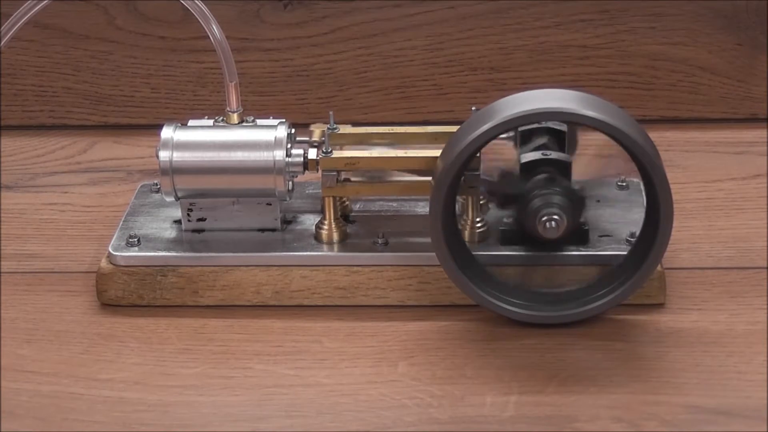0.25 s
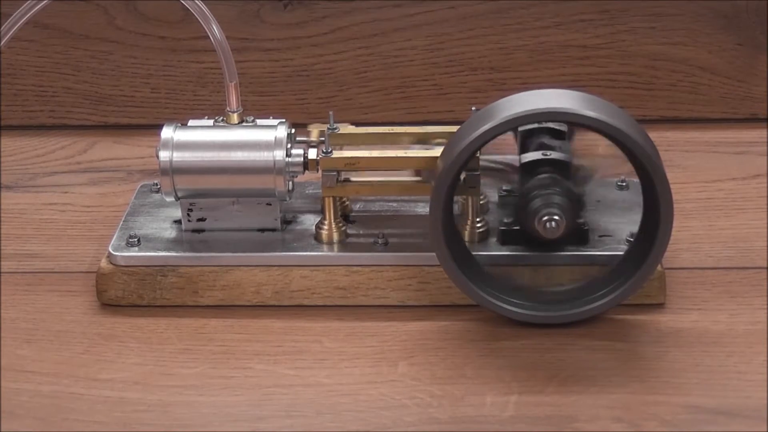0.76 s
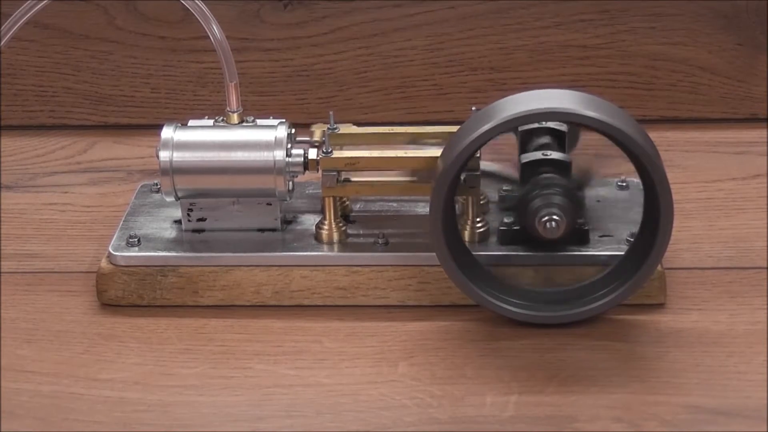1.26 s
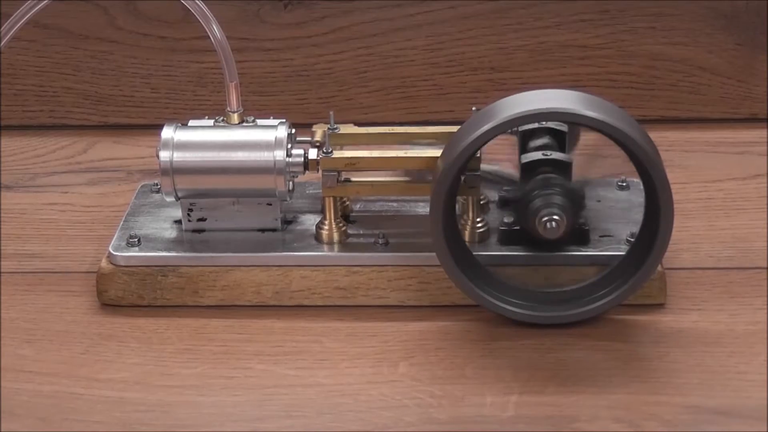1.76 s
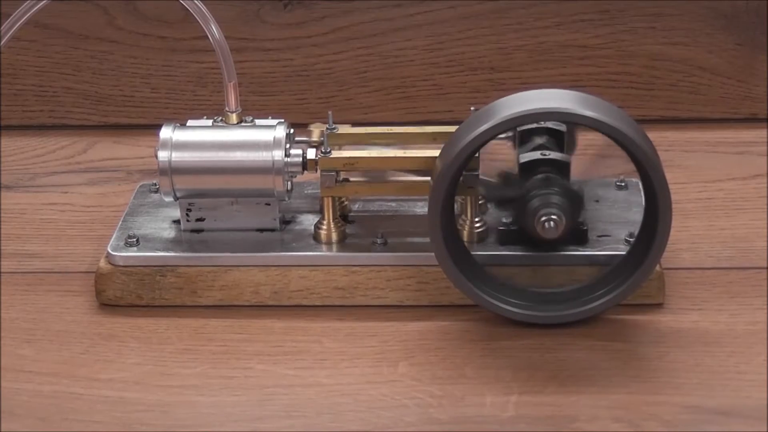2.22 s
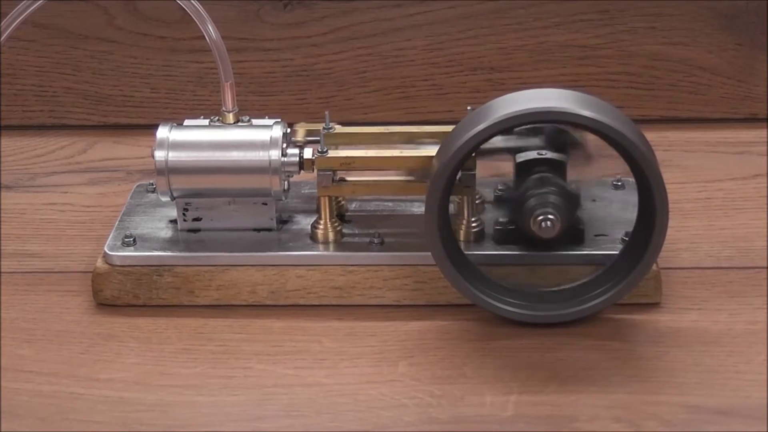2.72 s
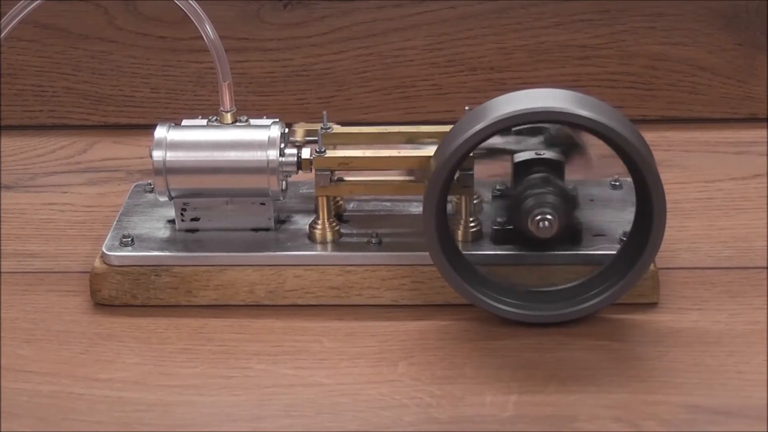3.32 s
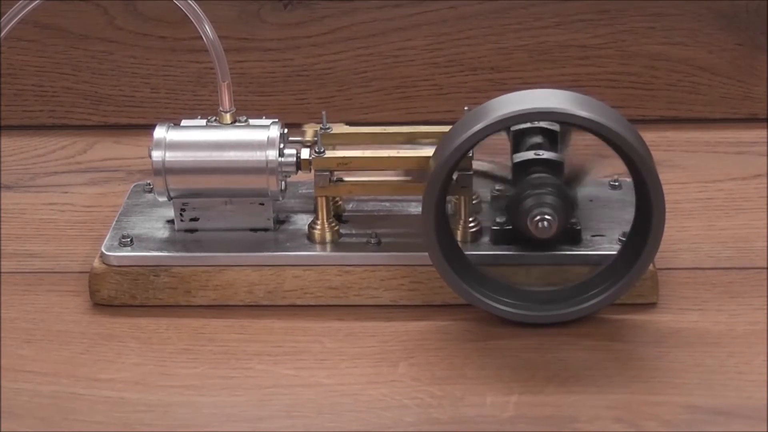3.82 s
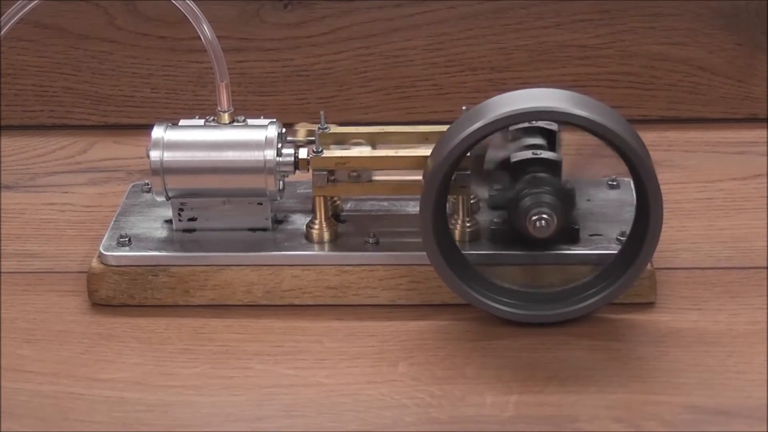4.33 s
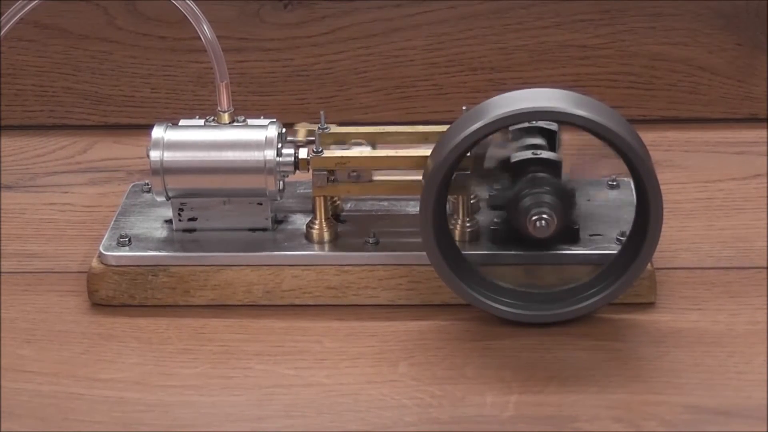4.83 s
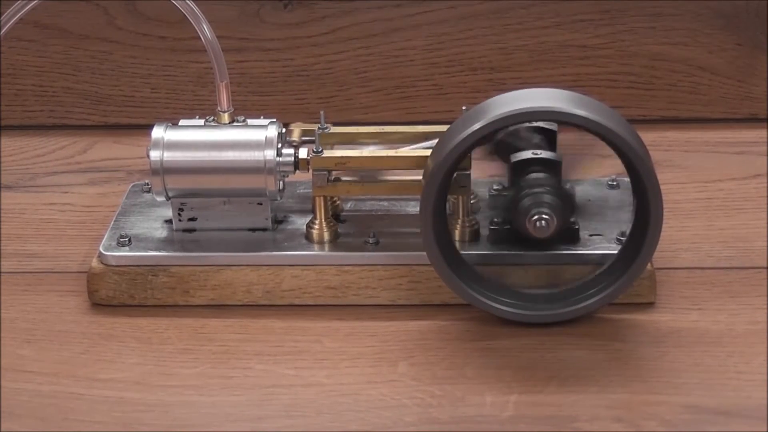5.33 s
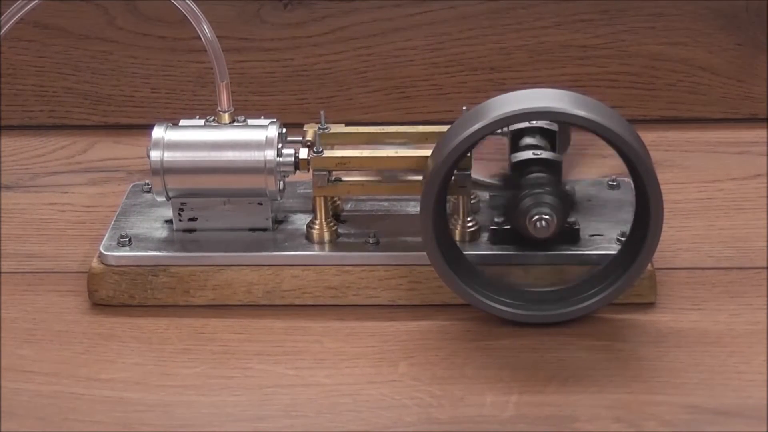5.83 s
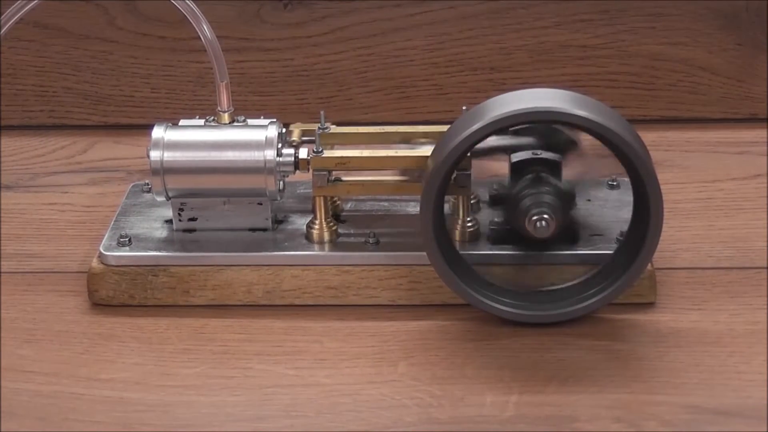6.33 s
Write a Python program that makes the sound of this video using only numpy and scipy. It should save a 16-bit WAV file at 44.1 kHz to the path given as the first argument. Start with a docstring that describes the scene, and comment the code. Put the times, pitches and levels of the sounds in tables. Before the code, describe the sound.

Rapid, regular clicking knocks and sharp exhaust puffs from a little flywheel engine, about six a second, over constant airy, whistling hiss.

```python
"""A small single-cylinder model steam engine runs on a wooden bench, from about five turns a second to
nearly seven and back. Each turn the valve lets out one strong and one weak exhaust puff: shaped noise.
A leak at the cylinder whistles high above: narrow noise bands that dip as the valve changes over.
The crank knocks once a turn: noise clicks, pings, a modal ring of the base, bench drum and low thuds.
The knocks have a short tail of reflections; steady low room noise lies under it all."""
import sys
import numpy as np
from scipy import signal
from scipy.fft import rfft, irfft
from scipy.io import wavfile

SR = 44100
rng = np.random.default_rng(int(sys.argv[2]) if len(sys.argv) > 2 else 0)


def output_pcm(signal):
    """Save a mono or channel-first signal as 16-bit PCM at the path in sys.argv[1].

    Samples are clipped to [-1, 1] before scaling.
    """
    pcm = np.clip(np.atleast_2d(signal).T, -1, 1) * 32767
    wavfile.write(sys.argv[1], SR, np.round(pcm).astype(np.int16))


N = 289737
TIME, HZ = np.arange(N) / SR, np.fft.rfftfreq(N, 1 / SR)


def gain_of(db):
    """Decibels to amplitude."""
    return 10 ** (np.asarray(db) / 20)


def evened(x):
    """Scales to an rms of one."""
    return x / np.sqrt(np.mean(x ** 2) + 1e-20)


def trace(points, x):
    """Joins the points by straight lines."""
    return np.interp(x, *np.transpose(points))


def read(points, hz):
    """Joins the points by straight lines on a log-frequency axis."""
    f, value = np.transpose(points)
    return np.interp(np.log(hz + 1), np.log(f + 1), value)


def add(mix, s, sound):
    """Mixes a sound into mix, in place, at time s."""
    part = mix[..., round(s * SR):][..., :sound.shape[-1]]
    part += sound[..., :part.shape[-1]]


def bell(centre_hz, width_hz):
    """Resonance curve: 1 at the centre, 1/2 at half a width to either side."""
    return 1 / (1 + (2 * (HZ - centre_hz) / width_hz) ** 2)


def wander(rate_hz):
    """Smooth chance of rms one, mostly slower than the rate."""
    return evened(irfft(rfft(rng.standard_normal(N)) * np.exp(-(HZ / rate_hz) ** 2), N))


# likeness of left and right: (frequency [Hz], likeness [-1..1])
LIKENESS = [(100, .7), (400, .95), (900, .9), (1500, .98), (3000, .93), (4500, .995), (8000, .995),
            (9600, .98), (11000, .7), (12500, .6), (14200, .1), (16000, .2)]
# left minus right: (frequency [Hz], difference [dB])
BALANCE = [(100, 1), (1300, 0), (2400, -.5), (4400, 0), (9000, 0), (13000, 3.5), (16000, 0)]


def noise(gain, likeness=LIKENESS, spread=1):
    """Stereo noise, rms one, spectrum gain, partly alike; spread scales how much the sides differ."""
    common, apart = rfft(rng.standard_normal((2, N)))
    same = np.clip(1 - spread * (1 - read(likeness, HZ)), -1, 1)
    lean = gain_of(read(BALANCE, HZ) / 2)
    mid, side = common * np.sqrt(1 + same), apart * np.sqrt(1 - same)
    return evened(irfft(gain * np.array([(mid + side) * lean, (mid - side) / lean]), N))


# crank speed: (time [s], speed [turns/s])
SPEED = [(0.0, 4.822), (0.81, 6.02), (1.11, 5.633), (1.42, 6.245), (2.11, 6.706), (3.2, 6.752),
         (3.74, 6.654), (5.06, 6.116), (5.98, 5.189), (6.57, 4.519)]
FIRST_KNOCK_S = 0.1335


def crank_angle():
    """Turns made since the first knock: the integral of the speed."""
    turns = np.cumsum(trace(SPEED, TIME)) / SR
    return turns - np.interp(FIRST_KNOCK_S, TIME, turns)


def passes(angle, share):
    """The moments [s], one a turn, at which the crank passes this share of its turn."""
    turns = np.arange(np.ceil(angle[0] - share), angle[-1] - share)
    return np.interp(turns + share, angle, TIME)


def turn_by_turn(times, scatter_db):
    """A level in dB drawn anew at each of the times, with straight lines between."""
    return np.interp(TIME, times, scatter_db * rng.standard_normal(len(times)))


# room noise spectrum: (frequency [Hz], relative level [dB/Hz])
ROOM_NOISE = [(20, -60), (55, -40), (90, -9), (145, 2.5), (230, -19), (450, 4), (900, -9), (3000, -2.5),
              (16000, -64)]


def room_noise():
    """Steady noise of the room, mostly low."""
    likeness = [(150, 0.96), (700, 1.0), (1500, 0.95)]
    return gain_of(-59) * noise(gain_of(read(ROOM_NOISE, HZ)), likeness)


# narrow resonances of frame and surroundings: (frequency [Hz], boost [dB])
COLOUR = [(1184, 5.5), (1421, 9), (1582, 4), (2121, 8), (2325, 7.5), (2457, 8), (2626, 11), (3294, 7),
          (3420, 10), (3466, -3), (3648, 10), (4005, 10), (4180, 2), (4310, 10), (4640, 7.5), (5087, 11),
          (5857, 10), (6022, 9), (6372, 8.5), (6809, 10.5), (7362, 10), (8252, 7), (9016, 5.5), (9265, 4),
          (9603, 1), (9830, 1.5)]


def frame_colour():
    """Resonances of the frame and its surroundings, as a gain on all the hiss."""
    return gain_of(sum(db * bell(hz, width_hz=26.7) for hz, db in COLOUR))


def jet(hiss, angle, flow, flutter_db, flutter_hz, spit_db):
    """Hiss that follows the valve; it flutters slowly and spits finely."""
    level_db = trace(flow, angle % 1)
    level_db += flutter_db * wander(flutter_hz) + spit_db * wander(rate_hz=850)
    return hiss * gain_of(level_db)


# main puff spectrum: (frequency [Hz], relative level [dB/Hz])
PUFF = [(60, -50), (150, -11.5), (700, -17.5), (1200, -10.5), (1950, -9), (2450, -2), (3600, 0.5),
        (4700, -0.5), (7000, -2), (9000, -4.5), (11000, 0.5), (13000, -0.5), (14300, -5), (16000, -9.5)]
# main puff over one turn from the knock: (share of turn [0-1], relative level [dB])
PUFF_FLOW = [(0, -1.5), (.06, -2.5), (.15, -6.5), (.3, -7.5), (.5, -16), (.658, -7.5), (.69, -1.5),
             (.76, -0.5), (1, 1.5)]
# slow drift of the main puff: (time [s], level [dB])
EXHAUST_LEVEL = [(0, 0), (2, -1), (2.8, .4), (3.6, -.4), (5.4, 0.8), (6.57, 0.8)]


def main_puff(angle, colour):
    """Strong exhaust puff: broadband hiss gated by the valve, a little different every turn."""
    hiss = noise(colour * gain_of(read(PUFF, HZ)), spread=0.47)
    puff = jet(hiss, angle, PUFF_FLOW, flutter_db=0.84, flutter_hz=55, spit_db=0.94)
    level_db = turn_by_turn(passes(angle, 0), scatter_db=0.5) + trace(EXHAUST_LEVEL, TIME)
    return gain_of(level_db - 34.0) * puff


# exhaust passage resonances: (frequency [Hz], width [Hz], relative level [dB])
PIPE = [(5560, 250, -2.5), (5740, 80, -0.5), (6097, 540, -5)]
# pipe note over one turn from the knock: (share of turn [0-1], relative level [dB])
PIPE_FLOW = [(0, -2), (.1, -8), (.3, -14), (.55, -39), (.68, -28), (.73, -9), (.79, -3.5), (1, -4)]
USUAL_TURNS_PER_S, NOTE_DB_PER_TURN_PER_S = 5.95, 2


def pipe_note(angle, colour):
    """Hiss through the resonances of the exhaust passage, louder the faster the engine runs."""
    pipe = np.sqrt(sum(gain_of(db) ** 2 * bell(hz, width) ** 2 for hz, width, db in PIPE))
    hiss = noise(colour * pipe, spread=0.35)
    note = jet(hiss, angle, PIPE_FLOW, flutter_db=2.0, flutter_hz=30, spit_db=1.9)
    haste = trace(SPEED, TIME) - USUAL_TURNS_PER_S
    level_db = turn_by_turn(passes(angle, 0), scatter_db=0.5) + NOTE_DB_PER_TURN_PER_S * haste
    return gain_of(level_db - 37.0) * note


# return puff spectrum: (frequency [Hz], relative level [dB/Hz])
RETURN = [(60, -40), (300, -7.5), (1000, -11.5), (1950, -11), (2500, -3.5), (3600, 0.5), (4600, -6),
          (6500, -7.5), (10000, -6), (13000, -12.5), (16000, -17.5)]
# return puff over one turn from the knock: (share of turn [0-1], relative level [dB])
RETURN_FLOW = [(0, -8.5), (.153, -3.5), (.21, -1), (.31, -1), (.45, -2.5), (.6, -3), (.66, -11), (1, -5)]


def return_puff(angle, colour):
    """Weaker puff of the return stroke: hiss gated by the valve."""
    hiss = noise(colour * gain_of(read(RETURN, HZ)), spread=0.21)
    puff = jet(hiss, angle, RETURN_FLOW, flutter_db=2.2, flutter_hz=39.4, spit_db=1.0)
    return gain_of(-38.5) * puff


def spits(times, size_db, scatter_db, t60_s):
    """Extra gain for a few milliseconds as the valve snaps open."""
    gain, t = np.ones(N), np.arange(SR // 20) / SR
    for s, chance in zip(times, rng.uniform(-1.2, 1, len(times))):
        add(gain, s, gain_of(size_db + scatter_db * chance - 60 * t / t60_s))
    return gain


# leak hiss spectrum: (frequency [Hz], relative level [dB/Hz])
LEAK = [(100, -41), (4000, -41), (6700, -13), (7500, -3.5), (8400, -1), (9500, -7.5), (10400, -10),
        (11300, -3), (12500, -7.5), (15000, -7.5), (16000, -12)]
# leak over one turn from the knock: (share of turn [0-1], relative level [dB])
LEAK_FLOW = [(0, -3.5), (.08, -4.5), (.157, -8.5), (.187, .5), (.27, -0.5), (.42, -3.5), (.58, -0.5),
             (.655, -8), (.695, 0), (.9, -5.5), (1, -1.5)]
# whistles of the leak: (frequency [Hz], width [Hz], relative level [dB])
WHISTLES = [(9000, 760, -7), (9726, 940, 0)]
RETURN_AT = 0.182  # share of a turn after the knock at which the valve opens for the return stroke


def whistling_leak(angle, colour):
    """Leak at the cylinder: high hiss and two noise-band whistles, each fluttering on its own."""
    hiss = noise(colour * gain_of(read(LEAK, HZ)))
    leak = gain_of(-38.0) * jet(hiss, angle, LEAK_FLOW, flutter_db=0.7, flutter_hz=45, spit_db=0.0)
    for hz, width, db in WHISTLES:
        band = noise(colour * bell(hz, width), spread=0.49)
        whistle = jet(band, angle, LEAK_FLOW, flutter_db=2.5, flutter_hz=53.6, spit_db=1.5)
        leak += gain_of(db - 37.5) * whistle
    returns = passes(angle, RETURN_AT)
    leak *= gain_of(turn_by_turn(returns, scatter_db=0.5))
    return leak * spits(returns, size_db=-10.5, scatter_db=12, t60_s=0.017)


def steam(angle):
    """Main puff with its pipe note, the weaker return puff, and the whistling leak."""
    colour = frame_colour()
    exhaust = main_puff(angle, colour) + pipe_note(angle, colour)
    return exhaust + return_puff(angle, colour) + whistling_leak(angle, colour)


def nearest(times, s):
    """Index of the time closest to s."""
    return np.argmin(abs(times - s))


HARD_KNOCKS = [.51, .69, 1.02, 2.89, 3.03, 3.18, 4.55, 4.87, 5.03, 5.36, 5.91]
HARD_CLICK_DB, HARD_RING_DB = 3, 1.3
RING_SCATTER_DB, SOFT_CLICK_DB = 0.76, 2.5


def knock_levels(times):
    """Ring and click of each knock in dB: most clicks firm, a few soft, the hard ones standing out."""
    weight, softness = rng.standard_normal((len(times), 2)).T
    hard = np.isin(np.arange(len(times)), [nearest(times, s) for s in HARD_KNOCKS])
    ring_db = RING_SCATTER_DB * weight + HARD_RING_DB * hard
    click_db = np.where(hard, HARD_CLICK_DB, -SOFT_CLICK_DB * softness ** 2)
    return ring_db, click_db


# modes of bed plate and wooden base: (frequency [Hz], relative level [dB], t60 [s], polarity [+1/-1])
BASE = [(152.1, -53.5, 0.29, 1), (327.6, -44, 0.2, 1), (413.6, -36.5, 0.22, 1), (455.3, -52, 0.29, 1),
        (501.5, -44, 0.33, -1), (555, -48.5, 0.3, -1), (622, -42, 0.1, -1), (791, -46.5, 0.069, -1),
        (869, -53, 0.18, 1), (1070, -56, 0.027, -1), (1168, -41, 0.045, -1), (1320, -40.5, 0.04, 1),
        (1582, -50.5, 0.15, 1), (1705, -50, 0.12, -1)]


def ring(t, scatter_db, detune, swell_s):
    """The base takes up the blow and rings with its modes, a little differently every time."""
    hz, db, t60_s, polarity = np.transpose(BASE)[:, :, None]
    size, shift = rng.standard_normal((2, len(BASE), 1))
    decay = polarity * gain_of(db + scatter_db * size - 60 * t / t60_s)
    modes = decay * np.sin(2 * np.pi * hz * (1 + detune * shift) * t)
    return modes.sum(0) * (1 - np.exp(-t / swell_s))


# bearing click spectrum: (frequency [Hz], relative level [dB/Hz])
CLICK = [(60, -29), (300, -1.5), (1200, -3), (2000, 2.5), (3500, -5), (6000, -30), (10000, -0.5),
         (13200, -2.5), (16000, -5)]


def knocks(times):
    """Bearing play closes once a turn: sharp click, short rattle, ring of the base, drum of the bench."""
    t = np.arange(SR // 3) / SR
    rings, drums, blows = np.zeros((3, N))
    click = gain_of(-29.5 - 60 * t / 0.0054)  # t60 in s, as below
    rattle = gain_of(-40 - 60 * t / 0.16)
    drum = gain_of(-45.0 - 60 * t / 0.25) * (1 - np.exp(-t / 0.01))  # blurred 10 ms onset
    for s, weight_db, blow_db in zip(times, *knock_levels(times)):
        add(rings, s, gain_of(weight_db - 4.0) * ring(t, scatter_db=1.5, detune=0.012, swell_s=0.0016))
        add(drums, s, gain_of(weight_db) * drum)
        add(blows, s, gain_of(blow_db) * (click + rattle))
    bench_gain = bell(centre_hz=444, width_hz=355) * (HZ > 100)
    bench = noise(bench_gain, likeness=[(250, 1.0), (700, 0.76)])
    return rings + drums * bench + blows * noise(gain_of(read(CLICK, HZ)))


def pings(times, ping_db, centre_hz, width_hz, t60_s, scatter_db):
    """Steel meeting steel gives every knock a tiny, very high ping: a decaying noise band."""
    t, blows = np.arange(SR // 20) / SR, np.zeros(N)
    for s, chance in zip(times, rng.uniform(-1.3, 1, len(times))):
        add(blows, s, gain_of(ping_db + scatter_db * chance - 60 * t / t60_s))
    return blows * noise(bell(centre_hz, width_hz), spread=0.5)


def thud_shape(crest_s, rebound):
    """One short push and a longer swing back."""
    u = np.arange(SR // 30) / SR / crest_s
    return np.exp(-(2.46 * (u - 1)) ** 2) - rebound * np.exp(-(1.05 * (u - 2.6)) ** 2)


# (time [s], relative level [dB], share opposite in left and right [0-1])
THUDS = [(.13, -31, 0.85), (.33, -22.5, 0.8), (.51, -28, 0.56), (.85, -28, 0.91), (1.37, -21, 0.89),
         (1.53, -34, 0.92), (1.68, -20.5, .89), (1.84, -32, 0.93), (2.29, -35, 0.98), (2.59, -31, 0.3),
         (2.89, -29, .8), (3.18, -25, .89), (3.33, -21, .86), (3.48, -30, .87), (3.63, -21.5, 0.82),
         (4.55, -27, 0.84), (4.71, -28.5, .9), (4.87, -22, .9), (5.72, -21, 0.9), (5.91, -32, 0.13),
         (6.31, -23.5, 0.8)]


def thuds(times, opposite_db, common_db):
    """A dry low thud comes with the heavy knocks, partly opposite in the two ears."""
    sides = np.array([[0.97], [-1.03]])
    opposite = gain_of(opposite_db) * thud_shape(crest_s=0.0014, rebound=0.42) * sides
    common = gain_of(common_db) * thud_shape(crest_s=0.0026, rebound=0.22)
    out = np.zeros((2, N))
    for s, db, share in THUDS:
        thud = share * opposite - (1 - share) * common
        add(out, times[nearest(times, s)], gain_of(db) * thud)
    return out


def room(x, wet_db, t60_s, apart):
    """A short tail of sparse reflections, mostly the same on both sides."""
    t = np.arange(SR // 2) / SR
    sparse = rng.random((2, len(t))) < 3000 / SR  # 3000 reflections/s
    taps = rng.standard_normal((2, len(t))) * sparse * (t > 0.005) * gain_of(-60 * t / t60_s)
    mid, side = taps / np.linalg.norm(taps, axis=1, keepdims=True)
    tail = np.array([mid + apart * side, mid - apart * side])
    return gain_of(wet_db) * signal.fftconvolve(x, tail, axes=1)[:, :N]


KNOCK_SCATTER_S = 0.0003


def scene():
    """Steam, knocks and the knocks' reflections over the low noise of the room."""
    angle = crank_angle()
    times = passes(angle, 0)
    times = times + KNOCK_SCATTER_S * rng.standard_normal(len(times))
    blows = knocks(times)
    blows += pings(times, ping_db=-29.0, centre_hz=13000, width_hz=1100, t60_s=0.013, scatter_db=3.5)
    low = thuds(times, opposite_db=4.0, common_db=3)
    tail = room(blows, wet_db=-10.5, t60_s=0.26, apart=0.3)
    return room_noise() + steam(angle) + blows + low + tail


EDGE_HZ = 15850


def record(dry):
    """The band limit of the recorder: a steep linear-phase low-pass."""
    lowpass = signal.firwin(601, EDGE_HZ, window=("kaiser", 8), fs=SR)
    return signal.oaconvolve(dry, lowpass[None], "same")


dry = scene()
out = record(dry)
output_pcm(out)
```